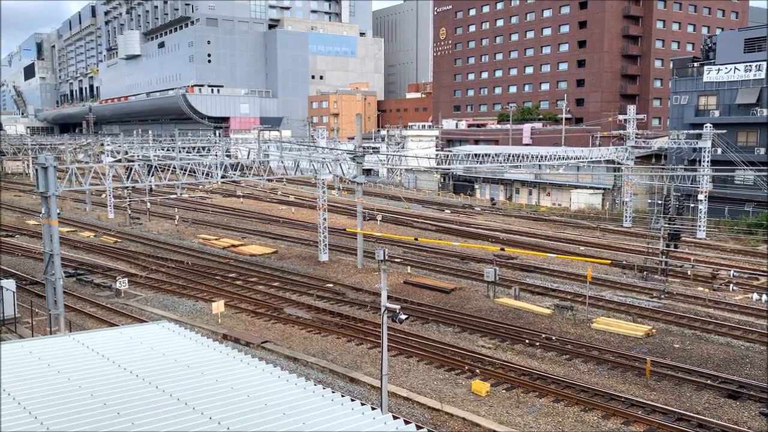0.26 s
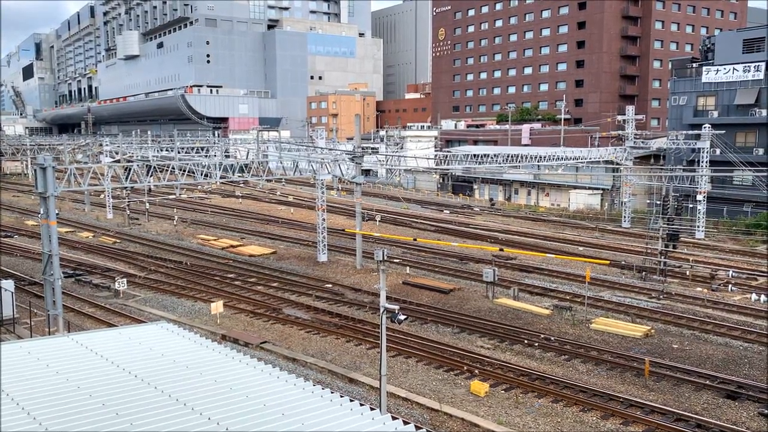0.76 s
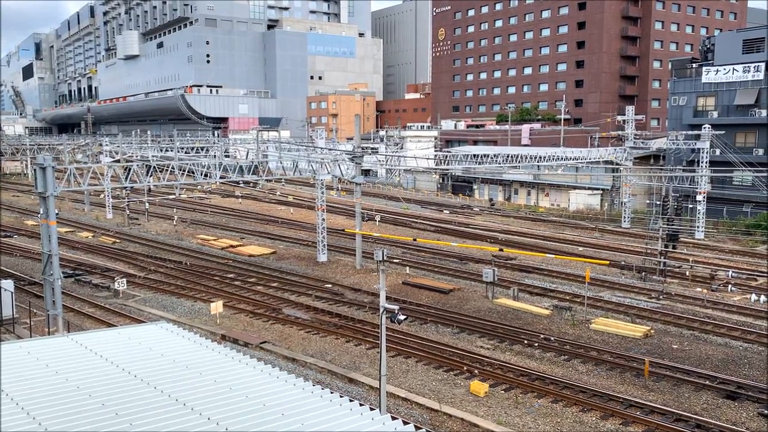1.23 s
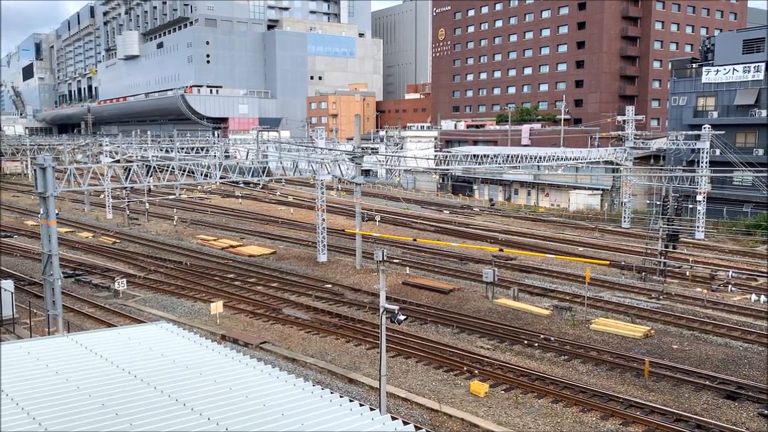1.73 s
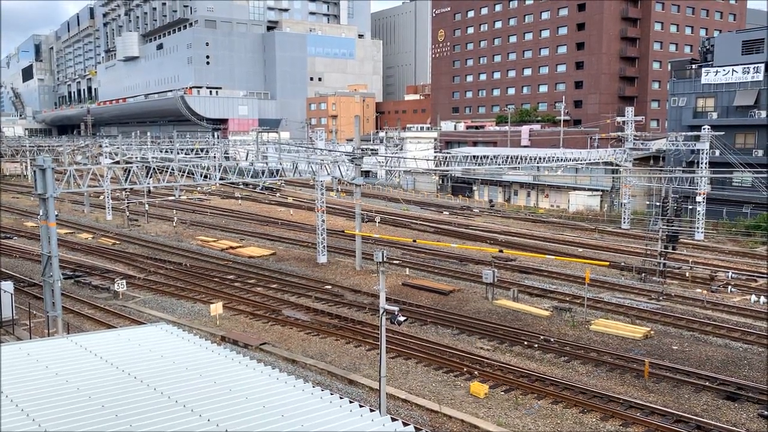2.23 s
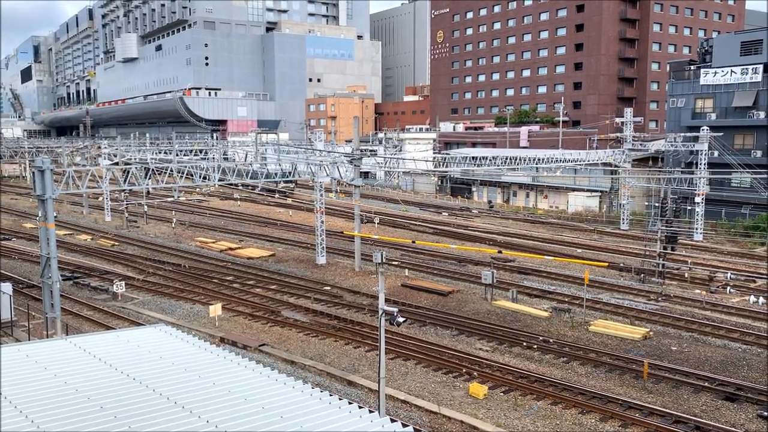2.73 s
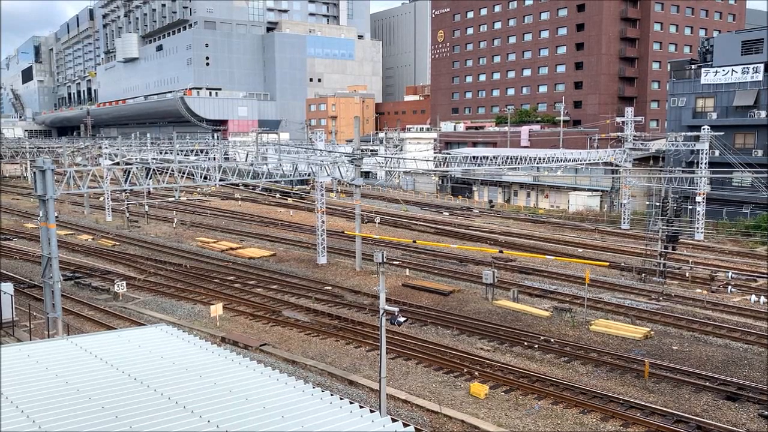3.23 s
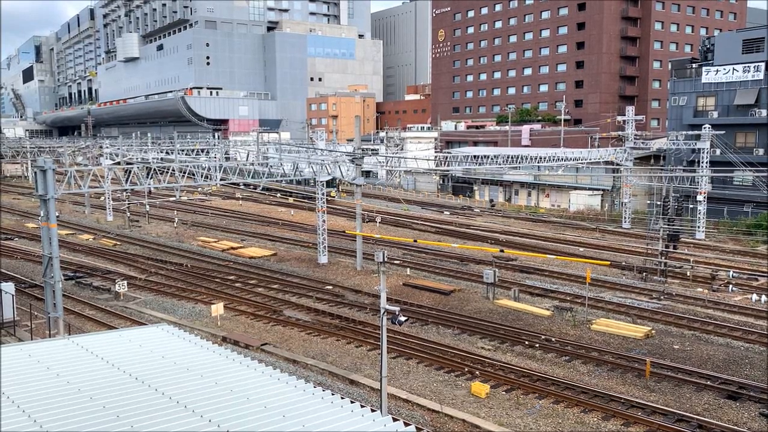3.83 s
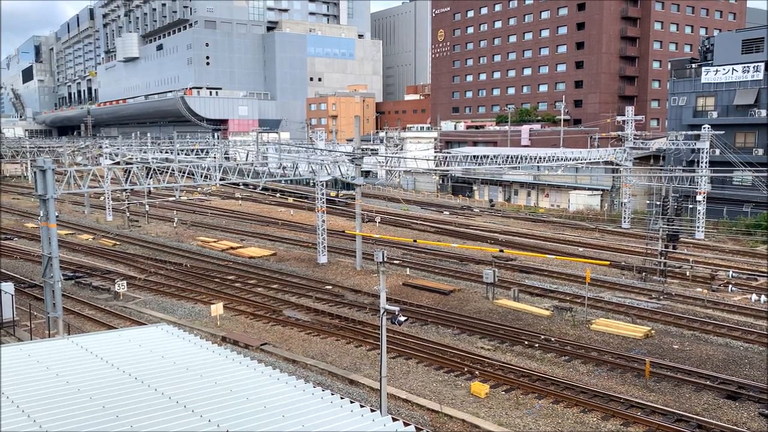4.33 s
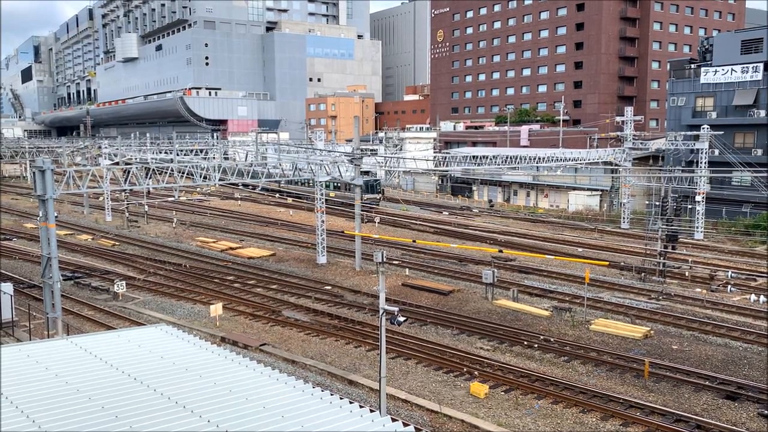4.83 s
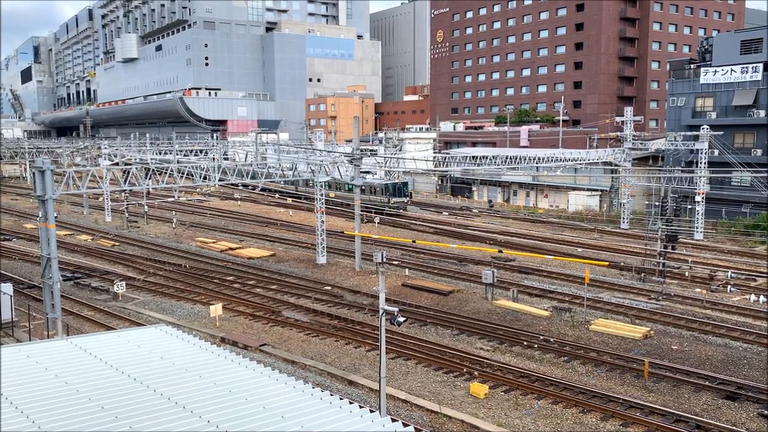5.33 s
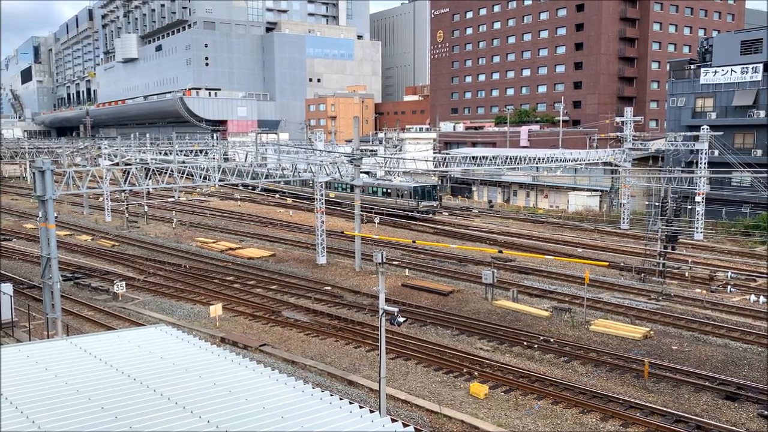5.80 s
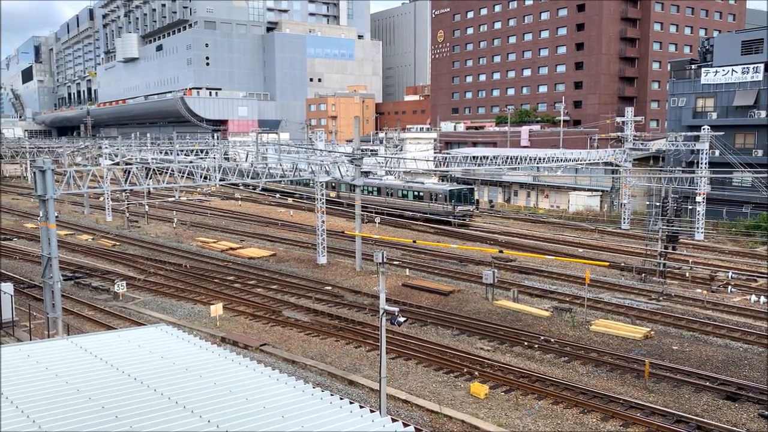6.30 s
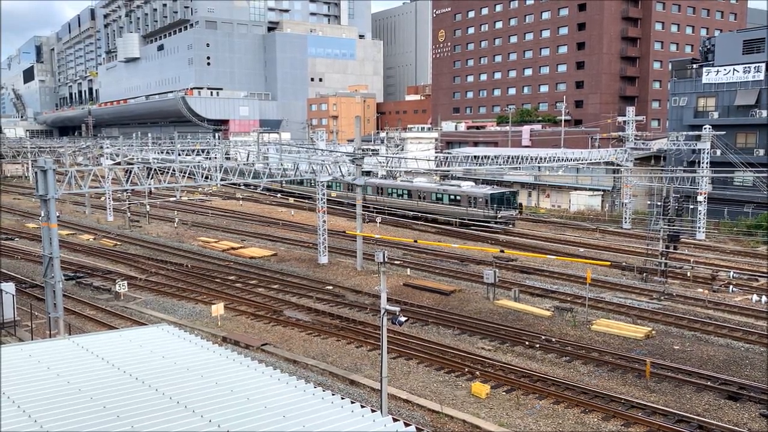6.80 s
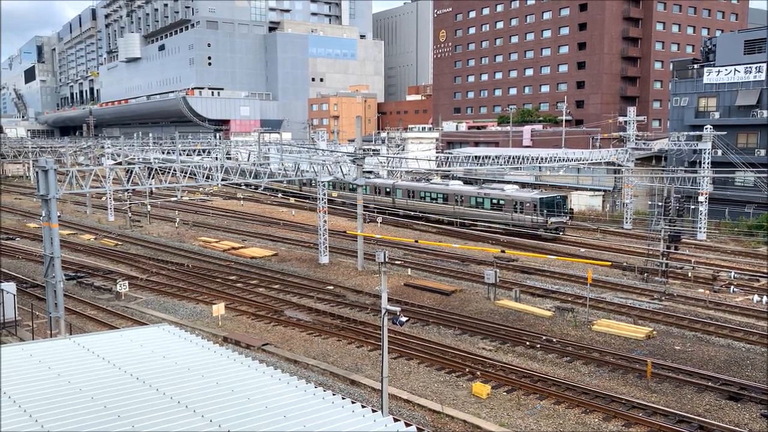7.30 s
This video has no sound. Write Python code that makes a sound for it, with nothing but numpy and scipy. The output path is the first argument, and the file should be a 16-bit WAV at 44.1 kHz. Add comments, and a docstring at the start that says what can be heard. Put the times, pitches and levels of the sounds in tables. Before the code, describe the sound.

Heard from above a wide station yard, a hidden diesel throbs low under a sputtering air hiss; both fade in the first two or three seconds. Then an electric train's wheels thud and clank in pairs over joints, growing harder and closer, with scraping flanges, short slaps off buildings and a steady low rumble swelling toward the end.

```python
"""In a wide station yard, heard from above the tracks, an electric train runs over joints and points.
Its wheels thud and clank in pairs: short noise bursts and struck modes that die away, echoed by buildings.
Flanges rub and grind, and shaped noise makes the rolling rumble, drumming and roar beneath.
At first a hidden diesel throbs, built from sliding tones, while a sputtering hiss of noise dies away."""
import sys
import numpy as np
from scipy import signal
from scipy.fft import rfft, irfft
from scipy.io import wavfile
from scipy.ndimage import uniform_filter1d

SR = 44100
rng = np.random.default_rng(int(sys.argv[2]) if len(sys.argv) > 2 else 0)


def transcribe(signal):
    """Save signal, clipped to [-1, 1], as a 16-bit WAV file at the path in sys.argv[1]."""
    frames = np.atleast_2d(signal).T
    limited = np.clip(frames, -1, 1)
    pcm = np.round(limited * 32767).astype(np.int16)
    wavfile.write(sys.argv[1], SR, pcm)


N = 332955
T = np.arange(N) / SR  # time of every sample [s]

# a two-axle bogie crosses a joint: (time [s], time to the trailing wheel [s], leading blow [dB],
# trailing blow [dB], extra leading thud [dB], extra trailing thud [dB], extra ping [dB],
# extra scrape [dB], lead of the left ear [ms])
BOGIE_PASSES = [(2.252, 0.19, -42, -33.5, -13, -8.5, -9, 0, 0.032),
                (3.040, 0.22, -30.5, -34.5, -6, -4, 5, 2.5, 0.049),
                (3.701, 0.21, -36, -34.5, 1.5, -7, 3, -3.5, .04),
                (4.226, 0.19, -31.5, -31, -4.5, -0.5, -13, -2.5, .04),
                (4.428, 0.2, -36, -34.5, 5, -1, 10, 4, 0.048),
                (4.861, 0.21, -22.5, -27.5, 3.5, 4.5, 6.5, 4.5, 0.039),
                (5.680, .207, -34, -34.5, 0.5, -5.5, 1, -12, .04),
                (6.213, 0.21, -22.5, -25.5, 1, 0, 3, 2.5, 0.044),
                (6.818, .204, -29.5, -28.5, 4, 4, -14, -2.5, -0.012),
                (6.894, .199, -22.5, -22, -6, -7.5, -7, 3.5, -0.052)]
# single knocks, and an early rasping tick in the hiss:
# (time [s], blow [dB], extra thud [dB], extra ping [dB], extra scrape [dB])
SINGLE_KNOCKS = [(.905, -34, -20, 3, 11), (2.385, -48.5, 14.5, -8, -1), (2.875, -31.5, -6, -7, -1),
                 (2.922, -38, -6, -8, 0), (3.543, -41, 9, -6, 0), (3.584, -45.5, 12.5, -8, -1),
                 (3.782, -40, 8, -12, -1), (4.196, -43, 11.5, -10, 2), (4.273, -34, -18, -11, 3.5),
                 (5.102, -29.5, -3, -6, 0), (5.244, -35, -10, -6, 0), (5.279, -33.5, -5, 6, -3),
                 (5.347, -41, 6, -4, -1), (6.595, -35, -8, -1, 4), (7.197, -34.5, -4, -2, 5),
                 (7.502, -33.5, 4.5, -8, -10)]
# modes of wheel and rail: (frequency [Hz], width [Hz], lift while rubbing [dB],
# struck level before the force is added [dB], time to fall 60 dB when struck [s])
WHEEL_MODES = [(1015, 60, 6.5, -4, .09), (1240, 68, 2, -5.5, .1), (2070, 260, 3.5, -3.5, 0.091),
               (2316, 55, -1.5, -0.5, 0.067), (2743, 92, 6, 1, .06), (2865, 140, 10.5, -5, 0.052),
               (3280, 120, 11, -8.5, .07), (3423, 68, 6, 5.5, 0.062), (3870, 110, 6, -20, 0.094),
               (4090, 160, 9, -17, .09), (4587, 82, 12, -18.5, .07)]
# modes of the track on its ballast: (frequency [Hz], level [dB], time to fall 60 dB [s])
TRACK_MODES = [(140, -9.5, .12), (196.3, -5.5, .11), (253.8, 0.5, 0.11), (322, -2, .1),
               (392.6, -4.5, 0.086), (466, -10.5, 0.091), (560.6, -16.5, 0.086)]
# the clank a blow stirs: (frequency [Hz], level [dB per Hz])
CLANK_SPECTRUM = [(20, -50), (70, 9.5), (160, 2.5), (400, 8.5), (600, 8.5), (900, 3.5), (1600, -1),
                  (2200, 3.5), (2500, -2), (3100, -8), (4300, -14), (6000, -25), (9000, -41.5),
                  (12000, -74.5)]
# the scrape of tread or flange: (frequency [Hz], level [dB per Hz])
SCRAPE_SPECTRUM = [(1000, -40.5), (2200, -19.5), (3700, 1.5), (4500, -1.5), (6500, -3), (8300, -11),
                   (9600, -19), (12000, -40.5), (16000, -54)]
# what a rubbing flange stirs: (frequency [Hz], level [dB per Hz])
RUB_SPECTRUM = [(500, -10), (1500, -1), (2250, 2), (3000, -9), (3450, -5.5), (3900, -13), (6000, -27),
                (10000, -53)]
# flanges grind through the points: (time [s], length [s], level [dB],
# lower singing mode [Hz], upper singing mode [Hz])
GRIND_EVENTS = [(6.805, 0.075, -39.5, 2070, 2860), (6.989, 0.082, -42.5, 2250, 3260)]
# what the grinding stirs: (frequency [Hz], level [dB per Hz])
GRIND_SPECTRUM = [(900, -20), (1700, -6), (2080, 2), (2450, -8), (2900, -13.5), (3250, -25), (3450, -22),
                  (3900, -20), (4600, -25), (6000, -29), (10000, -56)]
# a wheel squeaks briefly and a long thin singing sounds on the curve:
# (time [s], length [s], low edge [Hz], high edge [Hz], level [dB])
CURVE_SQUEAKS = [(3.565, 0.06, 2860, 2940, -48), (0.76, 5.9, 5150, 6550, -66.5)]
# the train draws near: (time [s], ground rumble [dB], drumming before surges [dB], roar before surges [dB])
APPROACH_LEVELS = [(0, -34, -39, -43), (2.5, -36.5, -39, -41.5), (3.2, -36.5, -37, -41),
                   (4.1, -35.5, -39.5, -42.5), (4.9, -36, -35.5, -40), (5.7, -38.5, -38, -40.5),
                   (7.0, -34, -36, -38.5), (7.55, -38.5, -38.5, -38.5)]
# rumble of the ground: (frequency [Hz], level [dB per Hz])
GROUND_SPECTRUM = [(20, -29.5), (32, -18), (48, -0.5), (65, -0.5), (100, 0), (140, 0), (175, -13.5),
                   (260, -46), (600, -85)]
# drumming of the car bodies: (frequency [Hz], level [dB per Hz])
DRUM_SPECTRUM = [(110, -29), (165, 3), (225, 1), (300, -1.2), (390, -2), (450, -10), (530, -23),
                 (700, -8.5), (1000, -29.5), (2000, -97.5)]
# roar of wheels and rails: (frequency [Hz], level [dB per Hz])
ROAR_SPECTRUM = [(240, -16), (400, -5.5), (701, -17.5), (791, -12.5), (1040, -13.5), (1210, -10),
                 (1390, -17.5), (2030, -17), (3340, -26.5), (3660, -28), (3950, -27.5), (8180, -47),
                 (15000, -105)]
# the hiss: (frequency [Hz], level [dB per Hz])
HISS_SPECTRUM = [(900, -33), (2200, -20), (3300, 0), (4300, 2), (5800, 3.5), (8200, -3.5), (9400, -12),
                 (13000, -24.5), (15500, -15.5)]
# the duller rush beneath the hiss: (frequency [Hz], level [dB per Hz])
RUSH_SPECTRUM = [(300, -35.5), (700, -11), (1000, -0.5), (1300, 0.5), (1600, -3.5), (2100, -8.5),
                 (3200, -16.5), (8000, -52)]
# fading of the rush: (time [s], level [dB])
RUSH_LEVELS = [(0, -41), (.14, -35), (.33, -37), (.58, -41.5), (1.05, -43), (1.5, -50.5), (2.2, -58)]
# escaping puffs of air: (time [s], length before the release [s], level [dB])
AIR_PUFFS = [(0, 0.27, -43.5), (0.222, 0.22, -45.5), (.98, 0.23, -55.5), (1.676, 0.086, -54),
             (2.19, 0.27, -58)]
# spurts in the hiss: (time [s], length [s], low edge [Hz], high edge [Hz], level [dB])
HISS_SPURTS = [(.21, .07, 1000, 2400, -41), (.24, 0.065, 4230, 8160, -39), (.325, 0.043, 4300, 7000, -39),
               (.39, 0.12, 3900, 4700, -43.5), (.39, .08, 5700, 8300, -45), (.85, 0.072, 4770, 6960, -47)]
# diesel engine: (time [s], firings [per s], level [dB])
ENGINE_COURSE = [(0, 29.4, -34), (.09, 29.7, -32), (.19, 28.9, -27.5), (.29, 27.4, -31.5),
                 (.345, 25.9, -23.5), (.41, 23, -27.5), (.47, 27, -26), (.55, 27.4, -31), (.63, 27.5, -30),
                 (.7, 28, -29), (.81, 25.7, -28), (.88, 24.6, -30.5), (.97, 25, -28), (1.16, 25.1, -28),
                 (1.36, 24.8, -30.5), (1.52, 23, -37.5), (1.66, 27, -49), (1.95, 23.3, -39.5),
                 (2.5, 27.6, -39.5), (3.5, 23.5, -58)]
# resonances of its exhaust: (frequency [Hz], level [dB])
EXHAUST_RESONANCES = [(49, -22), (54, -6), (58, 3), (66, -8.5), (75, -4.5), (83, -5), (87, -18), (101, -1),
                      (115, -4), (124, -11), (146, -19)]
# how alike both ears hear the open yard: (frequency [Hz], likeness [-1 to 1])
EAR_LIKENESS = [(60, 0.96), (99, 1), (160, 0.81), (270, 0.77), (440, 0.4), (730, -0.49), (1210, -0.39),
                (1990, -0.041), (3280, -0.099), (5410, -0.12), (8930, 0.32), (14700, -0.11)]
# what the buildings throw back: (frequency [Hz], level [dB])
FACADE_COLOUR = [(20, 0.5), (350, 1.5), (700, 2), (2300, 4.5), (2900, 1.5), (3450, -6.5), (4500, 2),
                 (9000, -6.5)]
# how the open-air tail dies: (frequency [Hz], time to fall 60 dB [s])
TAIL_DECAY = [(100, 0.92), (400, 0.29), (2000, 0.5), (3450, 0.38), (8000, 0.43)]
# balance of the two sides: (frequency [Hz], left minus right [dB])
SIDE_BALANCE = [(60, -2.5), (130, -2), (290, -2), (630, 1.4), (1390, 2.5), (3060, 0.5), (6710, -1.7),
                (14700, -0.5)]

# a blow of FIRM_DB gives these levels; each grows by its slope in dB per dB of blow
FIRM_DB = -22
SCRAPE_DB, SCRAPE_SLOPE = -51, 0.53
LOW_RING_DB, LOW_RING_SLOPE = -31.5, 0.99
HIGH_RING_DB, HIGH_RING_SLOPE = -38, 1.11
# fading time of the contact after a firm blow, and dB of longer chatter per dB of blow
CHATTER_S, CHATTER_SLOPE = 0.038, 0.21
FAR_BLUR_SLOPE = 0.5  # dB of longer attack per dB of weaker blow
REBOUND_S, REBOUND_DB = 0.02, -8.5  # typical wait before the second landing, and its level beside the first
POINTS_LEAD_MS = 0.049  # the points lie slightly left
# blows above the first level are preceded by rubbing
RUB_ABOVE_DB = -29
RUB_LEAD_S, RUB_SCRAPE_DB, RUB_GRIND_DB = 0.04, -53.5, -43
SING_DB = -3  # singing modes relative to the grinding
# surge of rolling noise after a bogie: delay, width, and levels relative to the mean of its two blows
SURGE_DELAY_S, SURGE_WIDTH_S, SURGE_DRUM_DB, SURGE_ROAR_DB = 0.17, 0.17, -12.5, -15.5
PUFF_ATTACK_S, PUFF_RELEASE_S = 0.0099, 0.12
LEAK_DB, LEAK_FALL_DB_PER_S = -45.5, 6.5
EDGE_HZ = 15300  # upper limit of the whole sound


def joints():
    """Wheels drop into rail gaps: track thuds, wheel clanks, rings and rebounds, tread scrapes."""
    clank = ringing(CLANK_SPECTRUM, steel=0.74)
    scrape = ringing(SCRAPE_SPECTRUM, steel=0.17)
    wheel_hz, _, _, struck_db, wheel_t60 = np.transpose(WHEEL_MODES)
    # single knocks and the early tick are made by the same steps
    knocks = [(*knock, POINTS_LEAD_MS) for knock in SINGLE_KNOCKS]
    out = np.zeros((2, N))
    for s, db, thud_db, ping_db, scrape_db, lead_ms in wheel_blows() + knocks:
        force = db - FIRM_DB
        chatter = CHATTER_S * amp(CHATTER_SLOPE * force)
        blur = amp(-FAR_BLUR_SLOPE * min(force, 0))  # faint, far blows arrive with softer edges
        doppler = np.interp(s, [4.8, 7.2], [1.008, 0.988])  # the pitch sinks as the train draws level
        modes_hz = wheel_hz * doppler
        low_db = LOW_RING_DB + LOW_RING_SLOPE * force
        high_db = HIGH_RING_DB + HIGH_RING_SLOPE * force + ping_db
        modes_db = struck_db + read([(2300, low_db), (3300, high_db)], wheel_hz)

        track_thud = amp(db + thud_db - 2.5) * thud()
        wheel_clank = amp(db - 10.0) * blow(clank, rise=0.0016 * blur, decay=chatter, grain_db=3.0)
        scrape_gain = amp(SCRAPE_DB + SCRAPE_SLOPE * force + scrape_db)
        tread_scrape = scrape_gain * blow(scrape, rise=0.0018, decay=0.039, grain_db=1.5)
        wheel_ring = ring(modes_hz, modes_db, wheel_t60, detune=0.011, rise=0.0023 * blur)
        rebound = ring(modes_hz, modes_db + REBOUND_DB, wheel_t60, detune=0.012, rise=0.0012)
        rebound_s = REBOUND_S * rng.uniform(0.7, 1.2)
        parts = [(0.002, track_thud), (0, wheel_clank), (0, tread_scrape),
                 (0, wheel_ring), (rebound_s, rebound)]
        for delay, sound in parts:
            add(out, s + delay, ears(sound, lead_ms))
    return out


def wheel_blows():
    """Both wheels of each bogie: (s, blow dB, extra thud, ping and scrape dB, left ear's lead ms)."""
    blows = []
    for s, gap_s, lead_db, trail_db, lead_thud_db, trail_thud_db, *colour in BOGIE_PASSES:
        blows.append((s, lead_db, lead_thud_db, *colour))
        blows.append((s + gap_s, trail_db, trail_thud_db, *colour))
    return blows


def blow(response, rise, decay, grain_db, size=6000):
    """A burst of grainy, chattering contact rings the steel; rms 1 over its first 25 ms."""
    t = np.arange(size) / SR
    grains = amp(grain_db * unit(uniform_filter1d(rng.standard_normal(size), size=80)))
    envelope = (1 - np.exp(-t / rise)) * np.exp(-t / decay)
    contact = rng.standard_normal(size) * grains * envelope
    sound = signal.fftconvolve(contact, response)
    return sound / np.sqrt(np.mean(sound[:SR // 40] ** 2))


def thud(loose=0.8):
    """The track bounces under a wheel as a set of low dying tones; rms 1 over its first 25 ms."""
    sound = ring(*np.transpose(TRACK_MODES), detune=0.087, rise=0.0034, loose=loose)
    return sound / np.sqrt(np.mean(sound[:SR // 40] ** 2))


def ring(modes_hz, modes_db, t60, detune, rise, loose=1, size=9000):
    """Struck modes die away; pitch and starting phase vary by chance, the phase more in loose contact."""
    t = np.arange(size) / SR
    shift, slip = rng.uniform(-1.024, 1, (2, len(modes_hz), 1))
    phase = np.arange(len(modes_hz))[:, None] + loose * slip  # half turns: neighbours alternate in sign
    mode_hz = modes_hz[:, None] * (1 + detune * shift)
    waves = np.sin(2 * np.pi * mode_hz * t + np.pi * phase)
    fading = amp(modes_db[:, None] - 60 * t / np.reshape(t60, (-1, 1)))
    return (fading * waves).sum(0) * (1 - np.exp(-t / rise))


def flanges(length=0.055):
    """Flanges ease against the guide rails just before each hard blow and slide off again."""
    grind = ringing(RUB_SPECTRUM, steel=0.75)
    scrape = ringing(SCRAPE_SPECTRUM, steel=0.23)
    pressure = signal.windows.tukey(int(length * SR), 0.5)
    out = np.zeros(N)
    for s, db, thud_db, *_ in wheel_blows():
        if db <= RUB_ABOVE_DB:
            continue
        lightness = amp(min(thud_db, 0))  # wheels that land lightly rub less
        contact = rng.standard_normal(len(pressure)) * pressure * lightness
        add(out, s - RUB_LEAD_S - 0.01, amp(RUB_SCRAPE_DB) * signal.fftconvolve(contact, scrape))
        add(out, s - RUB_LEAD_S, amp(RUB_GRIND_DB) * signal.fftconvolve(contact, grind))
    return out


def grinds():
    """A flange pressed on the points judders and keeps two wheel modes singing until it slips free."""
    out = np.zeros(N)
    for s, length, db, low_hz, high_hz in GRIND_EVENTS:
        pressure = signal.windows.tukey(int(length * SR), 0.3)
        unevenness = amp(3.0 * waver(rate_hz=200)[:len(pressure)])
        judder = pressure * unevenness * rng.standard_normal(len(pressure))
        add(out, s, amp(db) * signal.fftconvolve(judder, ringing(GRIND_SPECTRUM, steel=1.3)))
        song_hz, song_db = np.array([low_hz, high_hz]), np.array([0, -7.5])
        song = ring(song_hz, song_db, t60=0.056, detune=0.004, rise=0.0005)
        song = song / np.linalg.norm(song)
        add(out, s, amp(db + SING_DB) * signal.fftconvolve(judder, song))
    return out


def squeaks():
    """A wheel squeaks briefly and a long thin singing sounds on the curve, as bands of noise."""
    return swells(CURVE_SQUEAKS)


def far_knocks(per_s=7, level_db=-39, spread_db=3, count=70):
    """Cars further back knock dully over other joints, at chance times and strengths."""
    out = np.zeros(N)
    for chance, place, strength in rng.random((count, 3)):
        if chance < per_s * N / SR / count:  # keeps per_s knocks a second on average
            knock_db = level_db + spread_db * (2 * strength - 1.5)
            add(out, place * N / SR, amp(knock_db) * thud(loose=1))
    return out


def rolling():
    """Ground rumbles, car bodies drum, rough treads make wheels and rails roar; each bogie brings a surge."""
    ground_db, drum_db, roar_db = curves(APPROACH_LEVELS)
    surge_power = np.zeros(N)
    for s, _, lead_db, trail_db, *_ in BOGIE_PASSES:
        bump = np.exp(-((T - s - SURGE_DELAY_S) / SURGE_WIDTH_S) ** 2)
        surge_power += amp(lead_db + trail_db) * bump
    surge = np.sqrt(surge_power)

    ground_gain = amp(ground_db + 0.81 * waver(rate_hz=3.9))
    drum_gain = np.hypot(amp(drum_db), amp(SURGE_DRUM_DB) * surge) * amp(0.43 * waver(rate_hz=5.5))
    roar_gain = np.hypot(amp(roar_db), amp(SURGE_ROAR_DB) * surge)
    ground = ground_gain * diffuse(GROUND_SPECTRUM, patchy_db=1.04, flicker_db=1.5, size=4096)
    drum = drum_gain * diffuse(DRUM_SPECTRUM, patchy_db=1.5, flicker_db=0.5, size=2048)
    roar = roar_gain * diffuse(ROAR_SPECTRUM, patchy_db=2.1, flicker_db=0.78, steel=0.39)
    return ground + drum + roar


def hiss():
    """Leaking air and puffs sputter over a duller rush; the hiss loses its top as it fades."""
    (rush_db,) = curves(RUSH_LEVELS)
    leak = amp(LEAK_DB - LEAK_FALL_DB_PER_S * T) * np.interp(T, [2.4, 3.5], [1, 0])
    puff_power = sum((amp(db) * puff(s, length)) ** 2 for s, length, db in AIR_PUFFS)
    flow = np.sqrt(leak ** 2 + puff_power)
    sputter = unit(amp(1.2 * waver(rate_hz=310)))
    fresh = diffuse(HISS_SPECTRUM, patchy_db=2.2, flicker_db=0.5) * sputter
    spent = np.interp(T, [1.0, 2.5], [0, 1])
    sizzle = (1 - spent) * fresh + spent * band(fresh, 3500, 9100)
    rush = amp(rush_db) * diffuse(RUSH_SPECTRUM, patchy_db=2.0, flicker_db=1.5)
    return flow * sizzle + rush


def puff(s, length):
    """Air escapes with a quick rise, a hold and a release."""
    attack = np.clip((T - s) / PUFF_ATTACK_S, 0, 1)
    return attack * np.exp(-np.maximum(T - s - length, 0) / PUFF_RELEASE_S)


def spurts():
    """Short spurts in the hiss, with separate noise for each ear."""
    return np.array([swells(HISS_SPURTS), swells(HISS_SPURTS)])


def diesel():
    """Multiples of a far engine's firing rate slide through the resonances of its exhaust as it slows."""
    firing_hz, level_db = curves(ENGINE_COURSE)
    turns = np.cumsum(firing_hz * (1 + 0.0016 * waver(rate_hz=5.5))) / SR
    throb = np.zeros(N)
    for k in range(2, 6):
        gain = amp(read(EXHAUST_RESONANCES, k * firing_hz) + 0.3 * waver(rate_hz=4.4))
        throb += gain * np.cos(2 * np.pi * k * turns)
    return np.sqrt(2) * amp(level_db) * throb


def yard(x, echo_s=0.066, echo_decay_s=0.013, echo_db=-12, scatter_db=-7.5, scatter_s=0.0088,
         tail_db=-9.0, size=256):
    """Direct sound, scatter from the ground, a rattling slap off the buildings, an open-air tail."""
    flat = [(20, 0), (20000, 0)]
    field = diffuse(flat, patchy_db=0, flicker_db=0)[:, :SR]
    t = T[:SR]
    scatter = field * np.exp(-t / scatter_s) * (t > 0.003)

    ledges = amp(4.5 * waver(rate_hz=250)[:SR])  # uneven walls make the slap rattle
    slap = (t > echo_s) * np.exp(-abs(t - echo_s) / echo_decay_s)
    echo = diffuse(FACADE_COLOUR, patchy_db=-2, flicker_db=-3)[:, :SR] * ledges * slap

    hz, times, z = signal.stft(field, SR, nperseg=size)
    fading = amp(-60 * times / read(TAIL_DECAY, hz)[:, None])
    tail = signal.istft(z * fading, SR, nperseg=size)[1][:, :SR]
    tail = tail * np.clip(t / echo_s, 0, 1)

    response = amp(scatter_db) * unit(scatter) + amp(echo_db) * unit(echo)
    response = response + amp(tail_db) * unit(tail)[::-1]  # the tail has its ears swapped
    return x + signal.fftconvolve(x[:1], response / np.sqrt(SR), axes=1)[:, :N]


def diffuse(spectrum, patchy_db, flicker_db, steel=0, size=1024):
    """Noise from all around, most alike at both ears in the bass, with drifting patches, shared flicker."""
    hz, frames = np.fft.rfftfreq(size, 1 / SR), 4 * N // size + 5
    a, b, c, d, patches = rng.standard_normal((5, frames, len(hz)))
    patches = uniform_filter1d(patches, size=14, axis=0)  # smooth in time
    patches = unit(uniform_filter1d(patches, size=5, axis=1))  # smooth in frequency
    flicker = unit(uniform_filter1d(rng.standard_normal(frames), size=6))[:, None]
    same = np.clip(read(EAR_LIKENESS, hz), -1, 1)
    left = a + 1j * b
    right = same * left + np.sqrt(1 - same ** 2) * (c + 1j * d)
    level_db = read(spectrum, hz) + steel * wheel_db(hz) + patchy_db * patches + flicker_db * flicker
    z = np.array([left, right]) * amp(level_db)
    sound = signal.istft(z.swapaxes(1, 2), nperseg=size, noverlap=size - size // 4)[1]
    return unit(sound[:, :N])


def swells(rows):
    """Short or long bands of noise that swell and sink."""
    out = np.zeros(N)
    for s, length, low_hz, high_hz, db in rows:
        window = np.sin(np.pi * np.clip((T - s) / length, 0, 1)) ** 2
        out += amp(db) * window * unit(band(rng.standard_normal(N), low_hz, high_hz, order=24))
    return out


def ringing(spectrum, steel=0, size=4096):
    """How steel answers a tap: a response with this spectrum that starts at once, of energy 1."""
    hz = np.abs(np.fft.fftfreq(size, 1 / SR))
    log_gain = np.log(amp(read(spectrum, hz) + steel * wheel_db(hz)))
    # the Hilbert transform finds the phase that puts the energy earliest
    response = np.fft.ifft(np.exp(np.conj(signal.hilbert(log_gain)))).real[:size // 2]
    return response / np.linalg.norm(response)


def wheel_db(hz):
    """Lift of the wheel and rail resonances, each a peak around its mode."""
    return sum(db / (1 + (2 * (hz - f) / width) ** 2) for f, width, db, *_ in WHEEL_MODES)


def ears(sound, lead_ms):
    """The sound reaches the left ear a little before the right (after it, if negative)."""
    delay = np.exp(-2j * np.pi * np.fft.rfftfreq(len(sound), 1 / SR) * lead_ms / 1000)
    return np.array([sound, irfft(rfft(sound) * delay, len(sound))])


def band(x, low_hz, high_hz, order=6):
    """Smooth band-pass without delay."""
    hz = np.fft.rfftfreq(N, 1 / SR) + 1e-3  # avoids dividing by zero
    low_cut = 1 + (low_hz / hz) ** (2 * order)
    high_cut = 1 + (hz / high_hz) ** (2 * order)
    return irfft(rfft(x) / np.sqrt(low_cut * high_cut), N)


def waver(rate_hz):
    """Random wander of rms 1, with little motion faster than rate_hz."""
    hz = np.fft.rfftfreq(N, 1 / SR)
    return unit(irfft(rfft(rng.standard_normal(N)) * np.exp(-(hz / rate_hz) ** 2), N))


def curves(rows):
    """Each column of a curve table, sample by sample."""
    s, *columns = np.transpose(rows)
    return [np.interp(T, s, c) for c in columns]


def read(points, hz):
    """Reads a table on a log-frequency axis."""
    f, value = np.transpose(points)
    return np.interp(np.log(hz + 1), np.log(f + 1), value)


def add(mix, s, sound):
    """Adds a sound at time s, cut off at the end of the mix."""
    start = max(round(s * SR), 0)
    part = mix[..., start:][..., :sound.shape[-1]]
    part += sound[..., :part.shape[-1]]


def amp(db):
    """Decibels to gain."""
    return 10 ** (np.asarray(db) / 20)


def unit(x):
    """Scales to rms 1."""
    return x / np.sqrt(np.mean(x ** 2) + 1e-20)


def scene():
    """Everything in the yard; wheel blows, rubbing, grinding, squeaks and knocks, near and far, get echoes."""
    rubbing_and_far = flanges() + grinds() + squeaks() + far_knocks()
    wheels = joints() + ears(rubbing_and_far, POINTS_LEAD_MS)
    return yard(wheels) + rolling() + hiss() + spurts() + diesel()


def record(dry):
    """Left and right differ a little in colour; a low cut, then the band limit."""
    balance_db = read(SIDE_BALANCE, np.fft.rfftfreq(N, 1 / SR))
    coloured = irfft(rfft(dry) * amp([balance_db / 2, -balance_db / 2]), N)
    low_cut = band(coloured, 36, SR)
    limit = signal.firwin(511, EDGE_HZ, window=("kaiser", 9), fs=SR)
    return signal.oaconvolve(low_cut, limit[None], "same")


dry = scene()
out = record(dry)
transcribe(out)
```